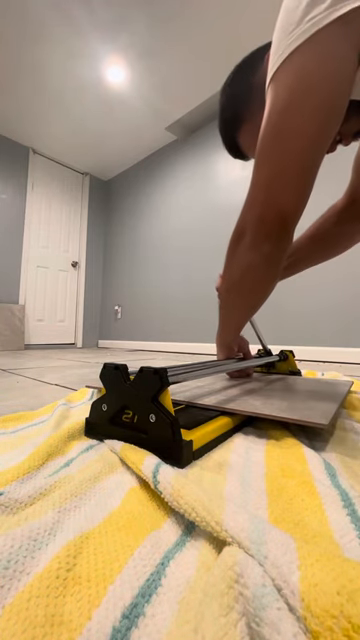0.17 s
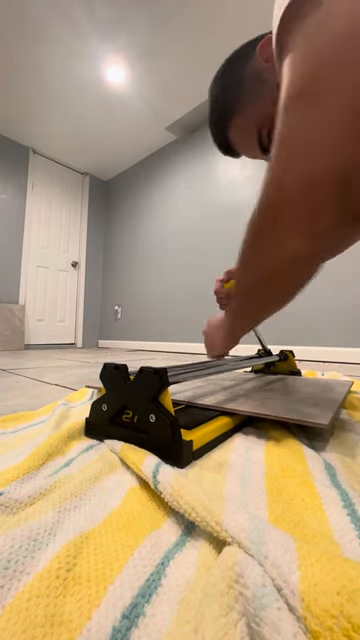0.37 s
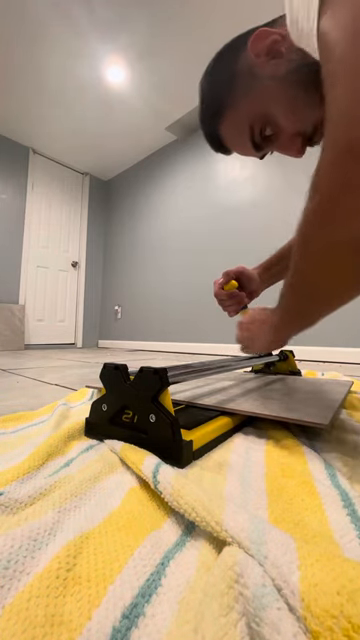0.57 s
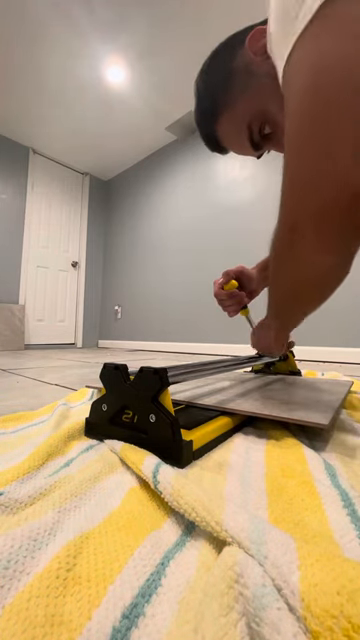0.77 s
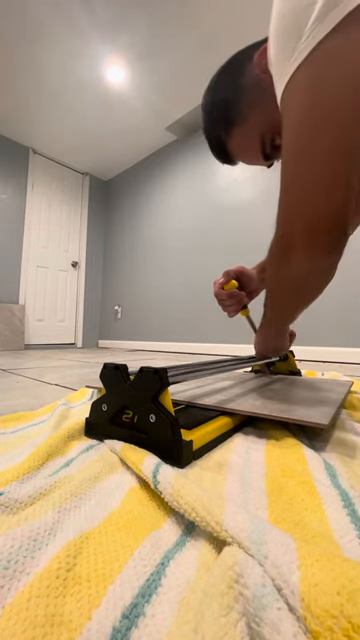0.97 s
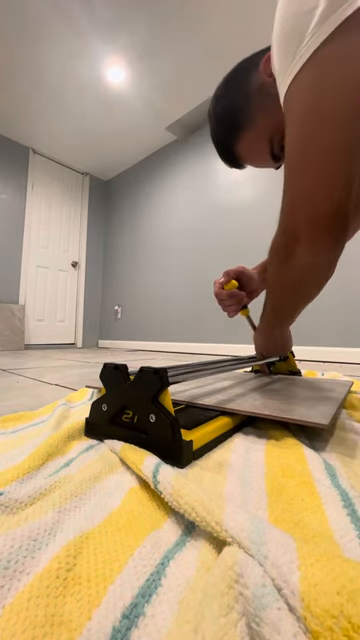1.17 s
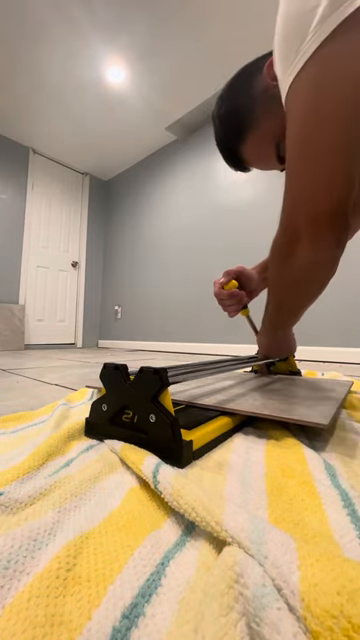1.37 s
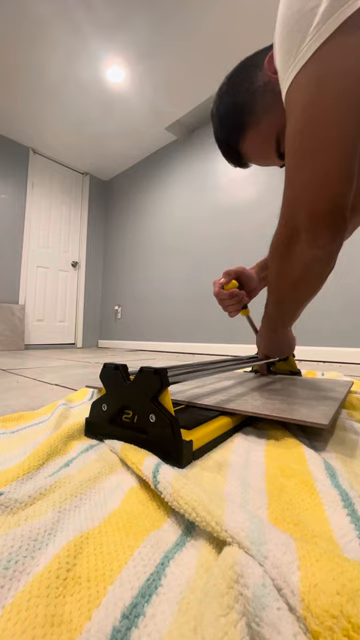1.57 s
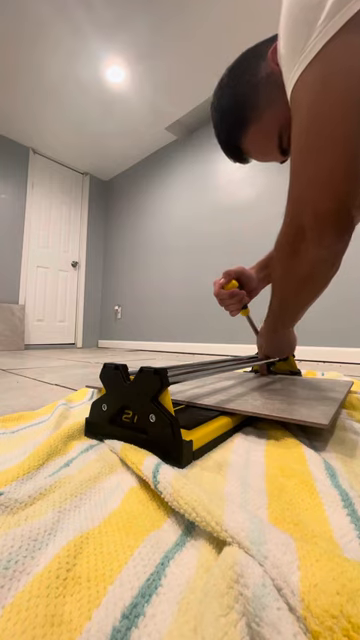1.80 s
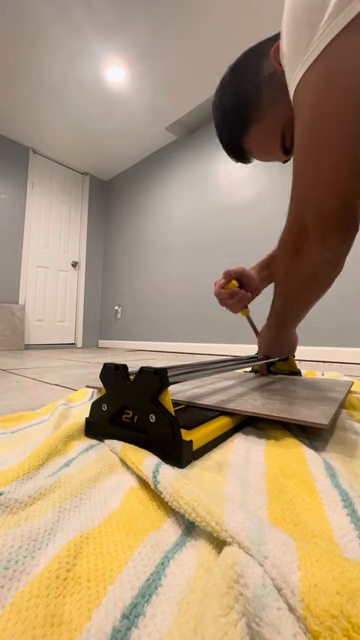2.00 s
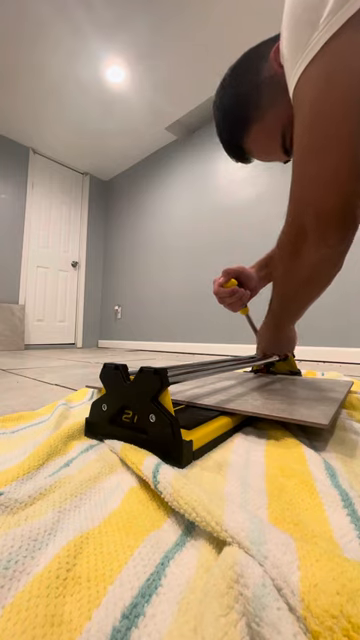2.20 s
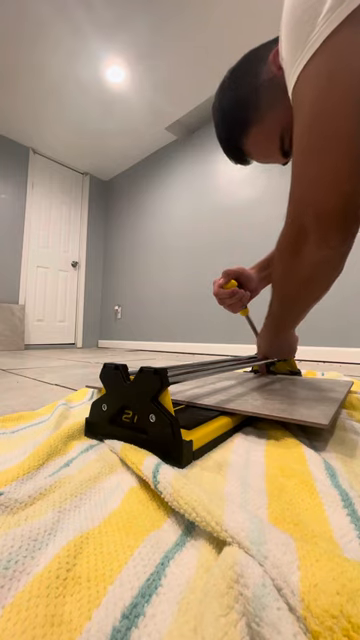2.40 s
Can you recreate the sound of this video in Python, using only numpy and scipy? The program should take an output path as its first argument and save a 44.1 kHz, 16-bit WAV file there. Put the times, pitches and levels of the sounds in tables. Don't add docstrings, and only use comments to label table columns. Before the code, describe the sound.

Manual tile cutter, close in a reverberant tiled room over faint low ventilation hum. A short slide and squeak at 0.2 s lead into a loud steel clank at 0.25 with a ringing rebound. Dull muffled base knocks follow at 0.8-1.0, then faint hand rubs until 1.8. At 2.02 thuds and very bright, hard wheel ticks, rattling at 2.1, then brief gritty scoring to 2.3, and a soft final knock.

```python
import sys
import numpy as np
from scipy import signal
from scipy.fft import rfft, irfft
from scipy.io import wavfile
from scipy.ndimage import uniform_filter1d

SR = 44100
rng = np.random.default_rng(int(sys.argv[2]) if len(sys.argv) > 2 else 0)


def store_wav(level_fs):
    pcm = np.round(np.clip(np.atleast_2d(level_fs), -1, 1) * 32767)
    wavfile.write(sys.argv[1], SR, pcm.T.astype(np.int16))


def invert_db(x):
    u = np.asarray(x, float) / 20
    return 10 ** u


N = 108045


def curve(table, hz):
    table_hz, value = np.array(table, float).T
    return np.interp(np.log(np.maximum(hz, 1)), np.log(table_hz), value)


def unit(x):
    return x / np.sqrt(np.mean(x ** 2) + 1e-30)


def shape(x, gain):
    hz = np.fft.rfftfreq(x.shape[-1], 1 / SR)
    return irfft(rfft(x) * gain(hz), x.shape[-1])


def colored_noise(size, table):
    return unit(shape(rng.standard_normal(size), lambda f: invert_db(curve(table, f))))


def peak(hz, width_hz):
    return lambda f: 1 / (1 + 1j * (f ** 2 - hz ** 2) / (np.maximum(f, 1) * width_hz))


def bandpass(x, order, low_hz, high_hz):
    return signal.sosfilt(signal.butter(order, [low_hz, high_hz], "band", fs=SR, output="sos"), x)


def decay(t, t60):
    return np.exp(-np.log(1000) * t / t60)


# frequency in Hz,
# correlation.
ALIKE = [(60, 0.96), (200, 0.99), (400, .5), (700, -.1), (2300, 0.24), (6500, 0.57), (9500, -.85),
         (12000, 0.33)]


def diffuse(size):
    mid, side = rng.standard_normal((2, size))
    alike = lambda f: np.clip(curve(ALIKE, f), -1, 1)
    mid = shape(mid, lambda f: np.sqrt((1 + alike(f)) / 2))
    side = shape(side, lambda f: np.sqrt((1 - alike(f)) / 2))
    return np.array([mid + side, mid - side])


def swell(start, db, rise, hold, fall):
    t = np.arange(N) / SR - start
    return invert_db(db) * np.clip(t / rise, 0, 1) ** 2 * np.exp(-np.maximum(t - rise - hold, 0) / fall)


def tone(hz, wobble_hz, wobble_db, smooth_s):
    wander = unit(uniform_filter1d(rng.standard_normal((2, N)), size=int(smooth_s * SR)))
    phase = 2 * np.pi * np.cumsum(hz + wobble_hz * wander[1]) / SR
    return np.sqrt(2) * invert_db(wobble_db * wander[0]) * np.sin(phase)


def ring(modes):
    hz, db, t60 = np.array(modes, float).T[:, :, None]
    t = np.arange(min(int(SR * t60.max()), SR // 2)) / SR
    level_luck, pitch_luck = rng.standard_normal((len(modes), 2)).T[:, :, None]
    level = invert_db(db + 1.5 * level_luck - 60 * t / t60)
    y = np.sum(level * np.sin(2 * np.pi * hz * (1 + .002 * pitch_luck) * t), axis=0)
    return np.pad(y, (0, SR // 2 - len(y)))


def strike(out, start, db, rise, fall, answer):
    t = np.arange(SR // 10) / SR
    envelope = np.clip(t / rise, 0, 1) * np.exp(-np.maximum(t - rise, 0) / fall)
    y = signal.fftconvolve(rng.standard_normal(len(t)) * envelope, answer)
    loudest = np.sqrt(np.max(uniform_filter1d(y ** 2, size=128)))
    k = int(start * SR)
    y = invert_db(db) * y[:N - k] / loudest
    return out + np.pad(y, (k, N - k - len(y)))


# frequency in Hz, level in dB.
AIR = [(25, -16.5), (111, -6.5), (198, -4.5), (422, -14), (1100, -22), (1700, -35.5), (6400, -46),
       (13000, -61)]
# frequency in Hz, width in Hz, level in dB.
HUM = [(38, 10, -72.5), (74, 20, -64.5), (153.4, 11, -67), (193.75, 8.9, -59.5), (248.9, 18, -62),
       (339.9, 31, -65), (571.5, 75, -66.5)]


def ventilation():
    out = invert_db(-60.5) * unit(shape(diffuse(N), lambda f: invert_db(curve(AIR, f)) * (f > 28)))
    for hz, width_hz, db in HUM:
        out = out + invert_db(db) * unit(shape(diffuse(N), lambda f: peak(hz, width_hz)(f) ** 2))
    drone = tone(289.9, wobble_hz=2.6, wobble_db=1.5, smooth_s=.05)
    return out + drone * swell(start=.43, db=-57, rise=.05, hold=.5, fall=.2)


# frequency in Hz, level in dB, 60 dB decay in seconds.
BASE_MODES = [(187, -16, .03), (281, -4.5, .05), (415.2, -1.5, .04), (628, 0, 0.035), (850, -1.5, 0.027),
              (1160, -5.5, .03), (1550, -9.5, 0.028), (2017, -6.5, 0.015)]
# start in seconds, level in dB, rise and fall in seconds, top of band in Hz.
THUDS = [(.03, -56, .006, 0.0087, 699.6), (.798, -37, .002, 0.0053, 800), (.812, -38, 0.0022, 0.008, 404),
         (.84, -45, 0.00137, 0.01, 400), (.887, -46, .002, 0.011, 404), (.99, -44.5, 0.0022, 0.019, 900),
         (1.24, -57, .01, 0.033, 1400), (1.435, -61, 0.0063, 0.016, 1500),
         (2.013, -33, 0.00109, 0.0103, 2570), (2.026, -28, 0.0023, 0.0064, 1024),
         (2.034, -26, 0.00073, 0.0051, 1545), (2.34, -44, 0.0018, .005, 900)]


def thuds():
    out = np.zeros(N)
    for start, db, rise, fall, top_hz in THUDS:
        out = strike(out, start, db, rise, fall, bandpass(ring(BASE_MODES), 3, 150, top_hz))
    return out


def flutter():
    return invert_db(2.1 * unit(uniform_filter1d(rng.standard_normal(N), size=500)))


# start in seconds, level in dB, rise, hold and fall in seconds.
RUBS = [
    (.06, -68, .1, .07, .02),
    (.206, -56, .008, .03, .005),
    (0.982, -71.5, 0.0022, 0.075, 0.045),
    (1.33, -75, .1, .03, 0.04),
    (1.52, -65.5, 0.011, .04, 0.029),
    (1.735, -82.5, 0.0028, 0.0068, 0.021),
    (1.8, -82.5, .02, 0.025, 0.025),
]
# frequency in Hz, level in dB.
RUB_COLOR = [(350, -30), (600, -8), (1000, -5), (2600, -8.5), (3800, -22), (6500, -17.5), (8300, -23.5),
             (10000, -12.5), (12500, -32)]


def rubs():
    return flutter() * colored_noise(N, RUB_COLOR) * sum(swell(*row) for row in RUBS)


def squeak():
    slip = tone(900, wobble_hz=40, wobble_db=2.2, smooth_s=.004)
    return slip * swell(start=.209, db=-43, rise=.008, hold=.02, fall=.004)


# frequency in Hz, level in dB, 60 dB decay in seconds.
CARRIAGE_MODES = [(431, -7, .07), (588.6, -2.5, 0.058), (785, -11, 0.068), (969, -15, .06),
                  (1154.5, -1, 0.052), (1524, 2, 0.061), (1746, -3.5, .07), (2138, 5, 0.065),
                  (2480, -4.5, .07), (3010, -6, 0.11), (3940, -7, 0.048), (5133, -6, 0.033),
                  (6287, -11, .03), (8750, -11, 0.12)]
# frequency in Hz, level in dB, 60 dB decay in seconds.
RAIL_MODES = [(445, -5, .6), (781, -6, .45), (962, -8.5, .35), (1152, -9, .4), (1554, -4, 0.42),
              (2190, -8.5, .4), (2655, -4.5, .45), (3268, -3, .45), (4017, -1, .42), (4227, -10, 0.42),
              (5071, -4.5, .45), (6520, -4, 0.48), (7480, -9, 0.24), (9820, -2.5, .35)]
# frequency in Hz, level in dB.
CLATTER_COLOR = [(250, -22), (500, -9), (1520, -8), (2140, -7), (4000, -15), (6390, -16), (10200, -19.5),
                 (12500, -35.5)]
# start in seconds, level in dB, rise and fall of rattle in seconds, top of band in Hz.
CLANKS = [
    (.222, -56, .0005, .002, 7000),
    (.245, -15.5, 0.0082, 0.0083, 9400),
    (.272, -29, .004, 0.011, 11000),
    (.987, -53, .0005, 0.0016, 2200),
    (2.0136, -41, 0.00087, 0.0037, 9000),
    (2.0235, -37.5, 0.0023, 0.0037, 13000),
    (2.036, -27.5, .002, 0.0027, 5000),
    (2.105, -37.5, .002, .005, 5080),
    (2.115, -27, 0.00063, 0.0085, 7300),
    (2.149, -40.5, .002, .005, 6050),
]


def clanks():
    out, t = np.zeros(N), np.arange(SR // 2) / SR
    split_rails = []
    for hz, db, t60 in RAIL_MODES:
        for k in (-1, 0, 1):
            split_rails.append((hz * (1 + k * .006), db - 3 * abs(k), t60))
    for start, db, rise, fall, top_hz in CLANKS:
        clatter = colored_noise(len(t), CLATTER_COLOR) * decay(t, .07)
        answer = ring(CARRIAGE_MODES) + invert_db(-15.5) * ring(split_rails) + invert_db(4) * clatter
        out = strike(out, start, db, rise, fall, bandpass(answer, 2, 350, top_hz))
    return out


# frequency in Hz, level in dB, 60 dB decay in seconds.
WHEEL_MODES = [(5860, -13.5, 0.0056), (6270, -12, 0.009), (7600, -18, .008), (9220, -6.5, .009),
               (9830, -13.5, .25), (10100, 0, 0.0071), (10390, -3, .007), (12300, -19.5, .006),
               (13720, -14.5, .01)]
# start in seconds, level in dB, rise and fall in seconds.
TICKS = [
    (2.015, -47.5, .0005, .001),
    (2.0245, -35.5, 0.0009, .003),
    (2.0358, -26, .0003, .0005),
    (2.037, -10.5, .0005, .0004),
    (2.039, -10, .0005, .0004),
    (2.0419, -22, .0004, .0008),
]


def ticks():
    out = np.zeros(N)
    for row in TICKS:
        out = strike(out, *row, np.diff(ring(WHEEL_MODES)))
    return out


# start in seconds, level in dB, rise, hold and fall in seconds.
SCORING = (2.13, -44, .05, .1, .05)
# frequency in Hz, level in dB.
SCORE_COLOR = [(200, -10), (307, -16), (450, -5), (843, -9), (2600, -9), (6370, -14), (10300, -13),
               (11800, -45)]


def scoring():
    crack = rng.random(N) < 1400 / SR
    grit = rng.standard_normal(N) * (.4 + crack * invert_db(1.5 * rng.exponential(size=N)))
    crunch = unit(shape(grit, lambda f: invert_db(curve(SCORE_COLOR, f))))
    metal = ring(CARRIAGE_MODES) + ring(RAIL_MODES) / 2
    shaken = unit(signal.fftconvolve(grit, metal)[:N])
    return flutter() * (crunch + invert_db(-8) * shaken) * swell(*SCORING)


def scattered(x, tail):
    return signal.fftconvolve(x[None], tail / np.sqrt(np.sum(tail ** 2) / 2), axes=1)[:, :N]


def floor_echo(x):
    return scattered(x, diffuse(512) * np.exp(-np.arange(512) / SR / .0015))


# frequency in Hz, 60 dB decay in seconds.
ROOM = [(125, .3), (500, .55), (2000, 0.63), (5000, .6), (8000, 0.42), (12000, .18)]


def room(x):
    t = np.arange(SR) / SR
    noise, tail = diffuse(SR), 0
    for hz in 62.5 * 2 ** np.arange(0, 8.5, .5):
        octaves = lambda f: np.log2(np.maximum(f, 1) / hz)
        band = shape(noise, lambda f: np.cos(np.pi / 2 * np.clip(2 * octaves(f), -1, 1)) ** 2)
        tail = tail + band * decay(t, curve(ROOM, hz))
    return scattered(x, tail * (1 - np.exp(-t / .008)))


def scene():
    x = thuds() + rubs() + squeak() + clanks() + ticks() + scoring()
    right = shape(x, lambda f: 1 - 2 * .92 * peak(9490, 3500)(f))
    heard = np.array([x, right]) + invert_db(-6) * floor_echo(x) + invert_db(-9) * room(x) + ventilation()
    return heard * invert_db(np.array([[0], [1.06]]))


def top_cut(x):
    return signal.sosfilt(signal.butter(12, 15210, fs=SR, output="sos"), x)


# frequency in Hz, gain of the side
# signal in dB.
SIDE_COLOR = [(150, 0), (550, 4.5), (1400, 0), (4500, 4), (8000, 1.5), (9800, 4.5), (11000, 0.5), (12000, -8)]


def record(dry):
    fade = np.minimum(np.arange(N + 2048, 0, -1) / 2048, 1)
    x = np.pad(dry, ((0, 0), (0, 2048)), mode="reflect") * fade
    x = shape(x, lambda f: (invert_db(-38) + 1 / (1 + (f / 12000) ** 24)) * (f < 15000))
    mid = (x[0] + x[1]) / 2
    side = shape((x[0] - x[1]) / 2, lambda f: invert_db(curve(SIDE_COLOR, f)))
    return top_cut(np.array([mid + side, mid - side])[:, :N])


dry = scene()
out = record(dry)
store_wav(out)
```